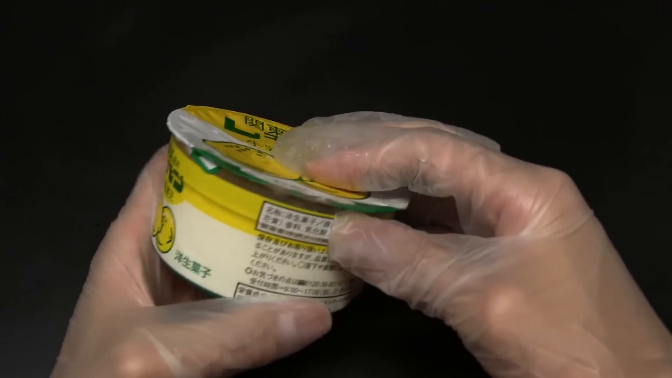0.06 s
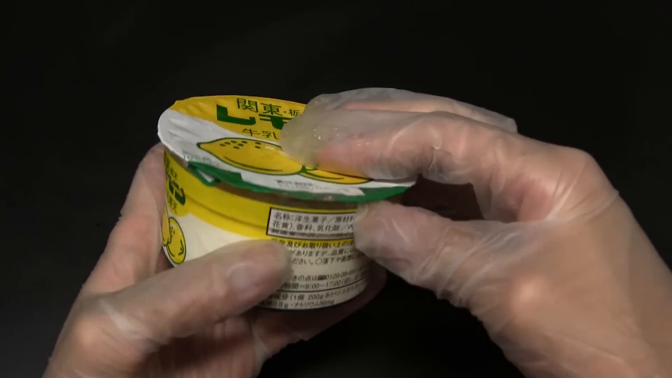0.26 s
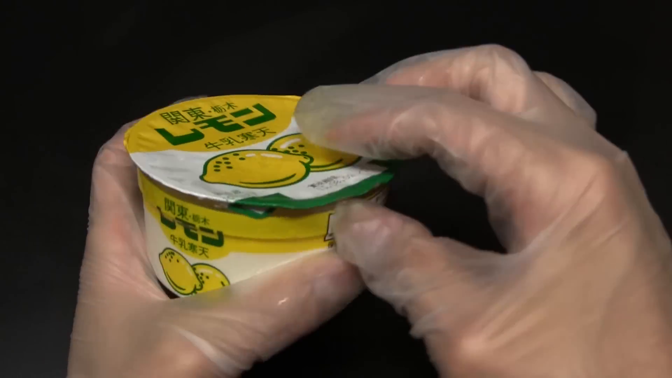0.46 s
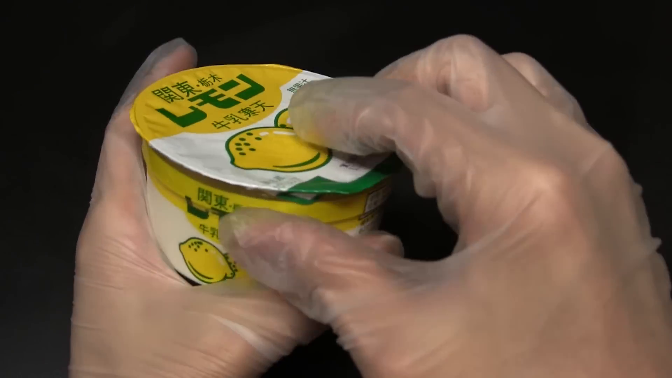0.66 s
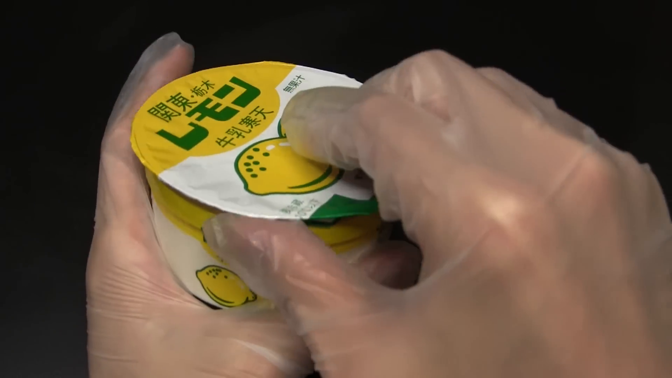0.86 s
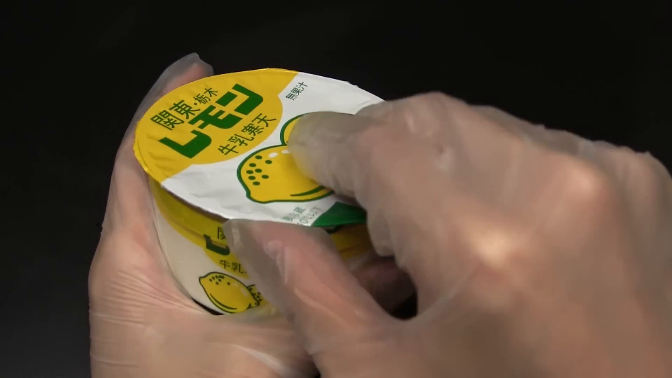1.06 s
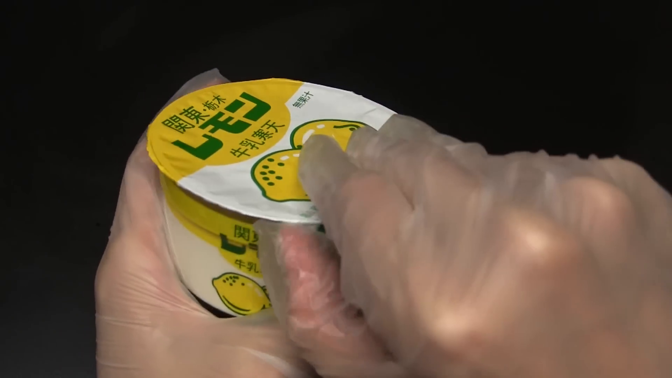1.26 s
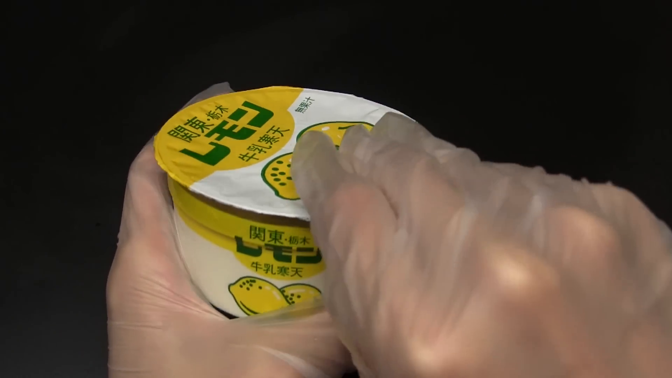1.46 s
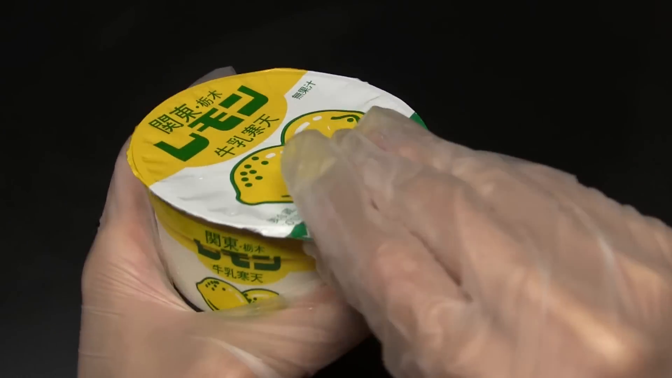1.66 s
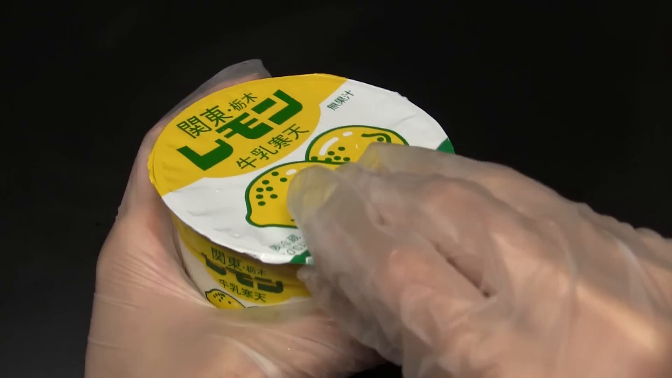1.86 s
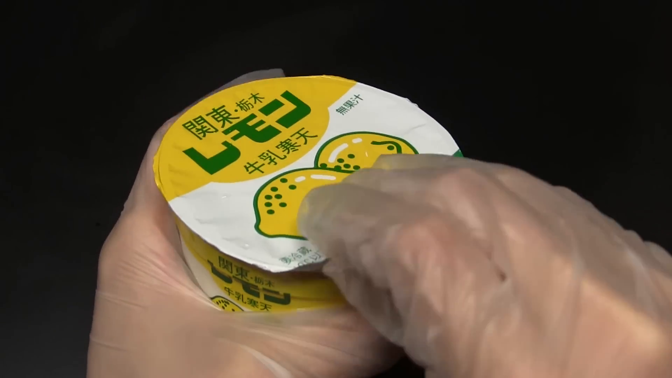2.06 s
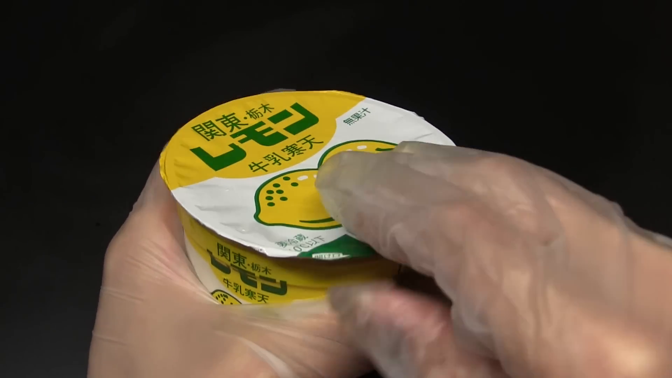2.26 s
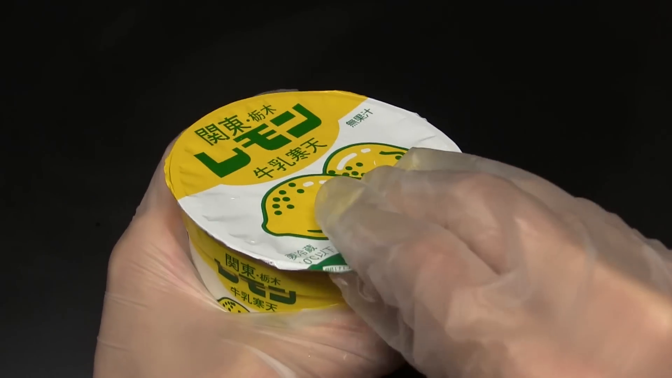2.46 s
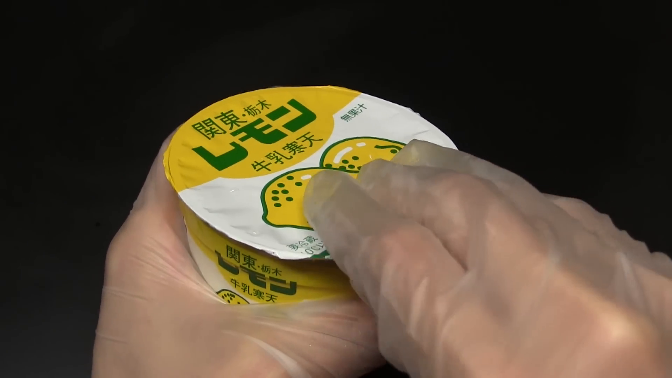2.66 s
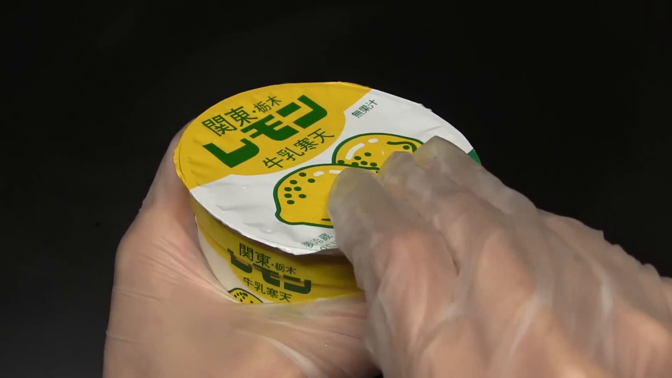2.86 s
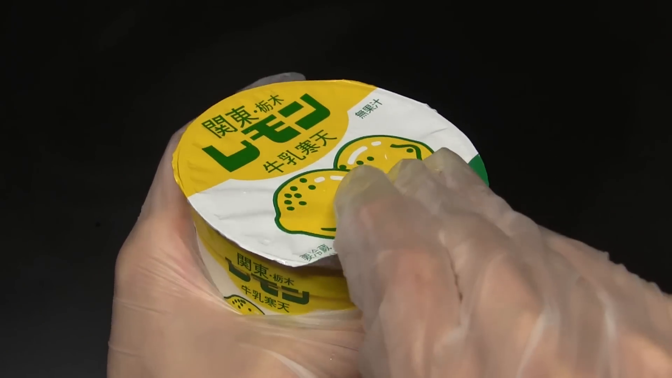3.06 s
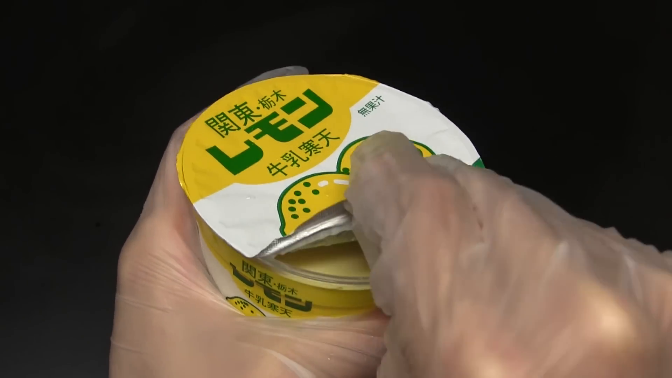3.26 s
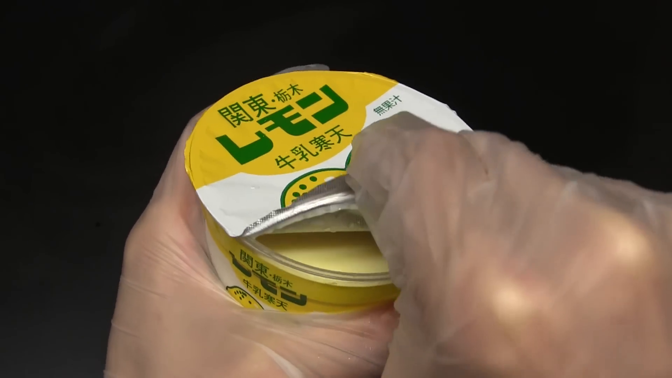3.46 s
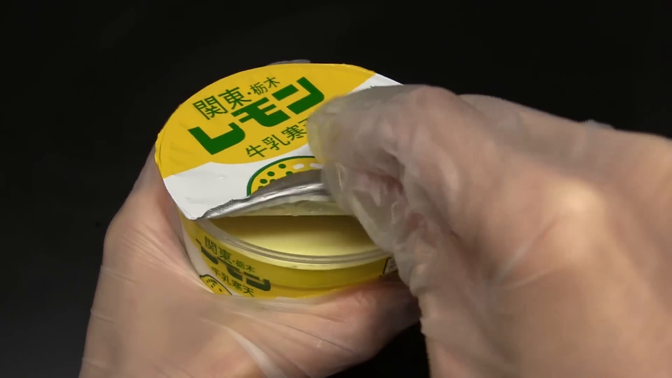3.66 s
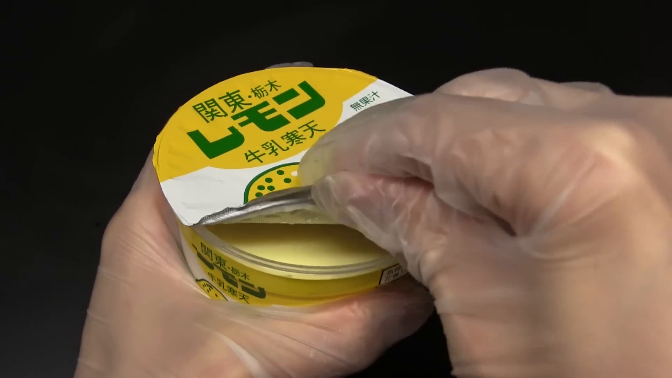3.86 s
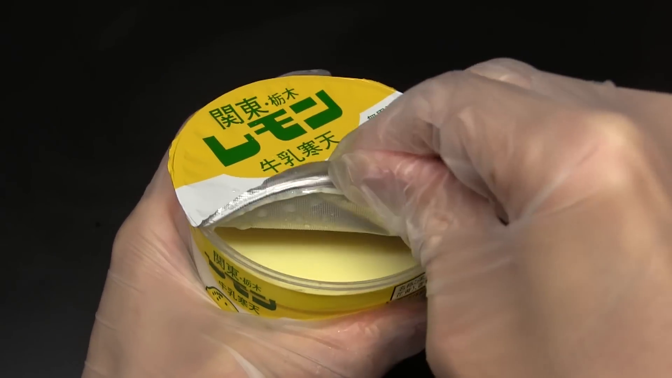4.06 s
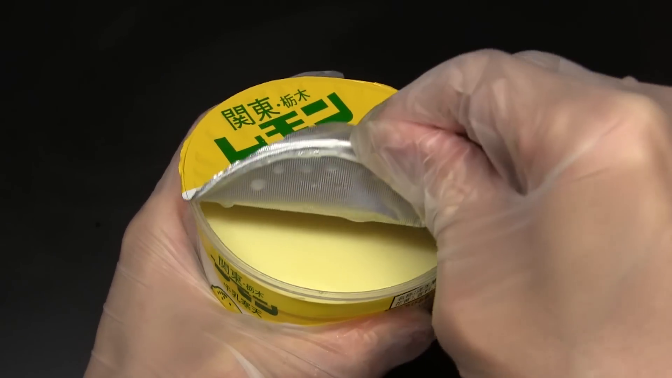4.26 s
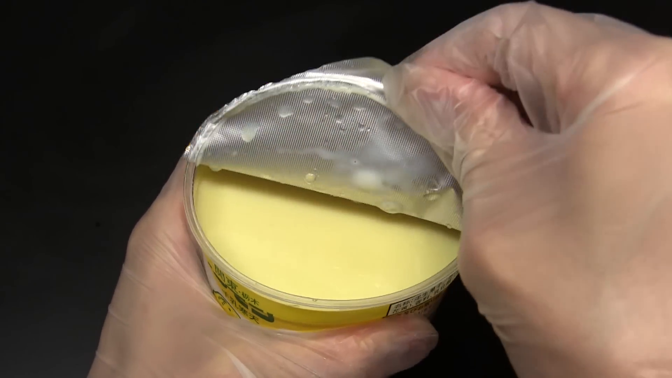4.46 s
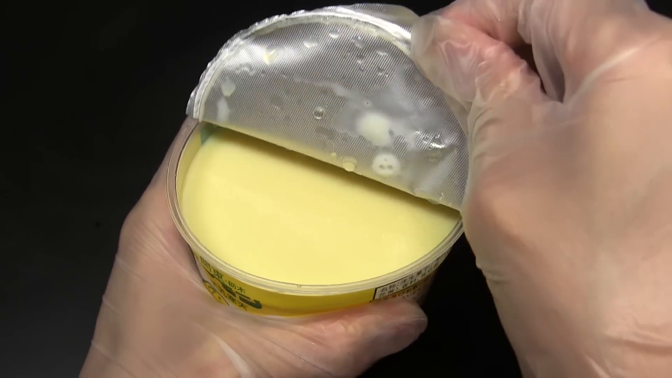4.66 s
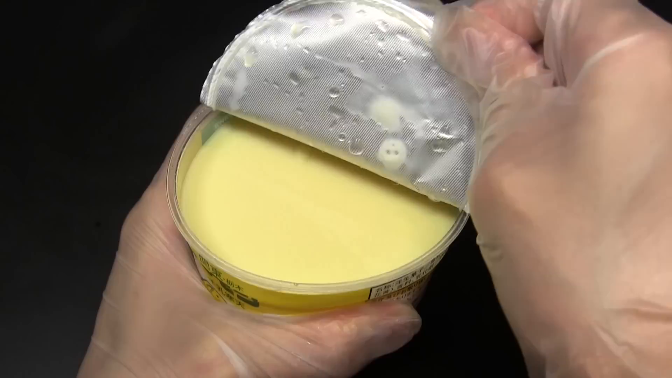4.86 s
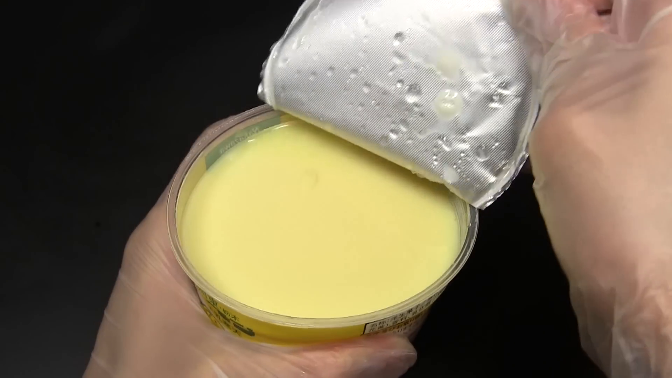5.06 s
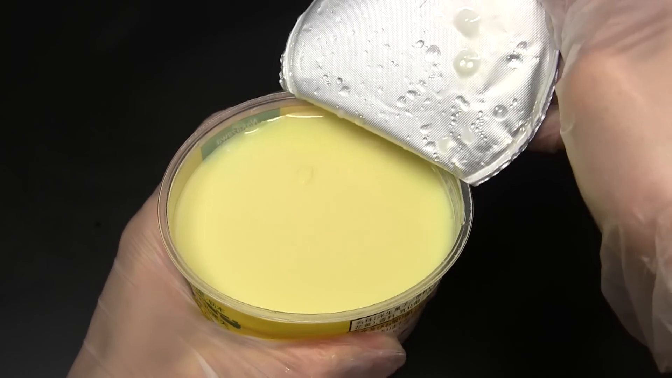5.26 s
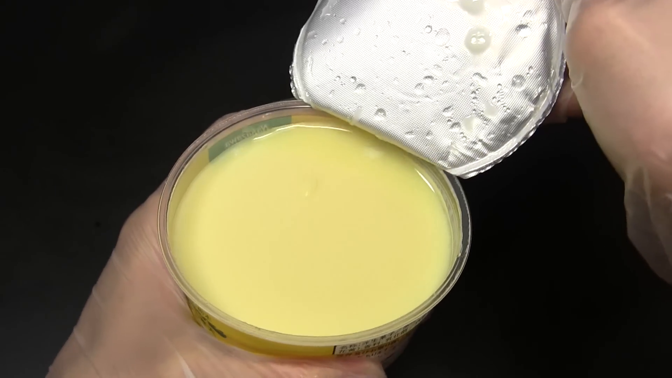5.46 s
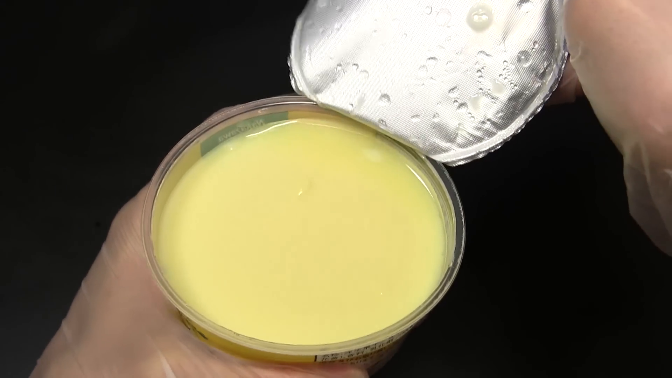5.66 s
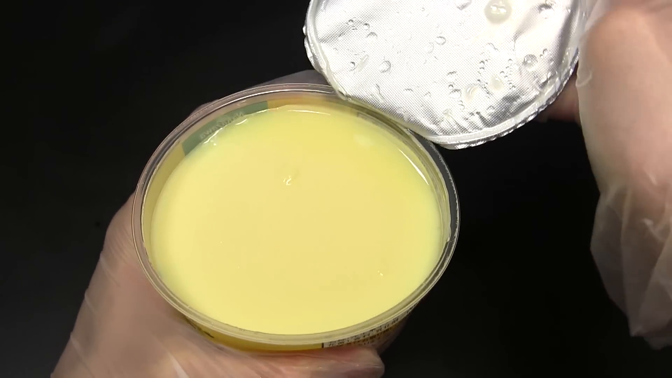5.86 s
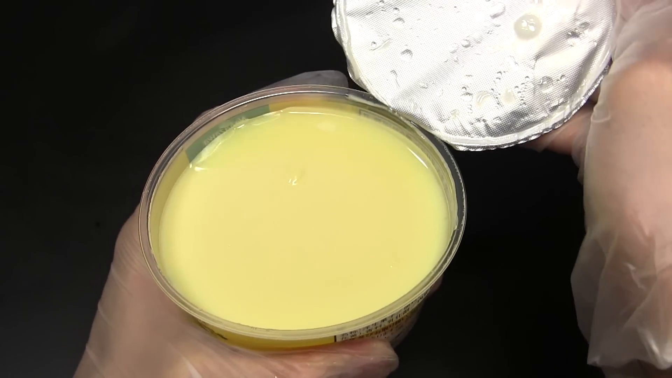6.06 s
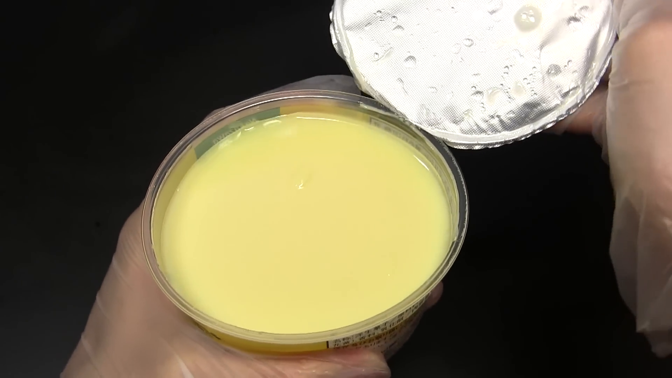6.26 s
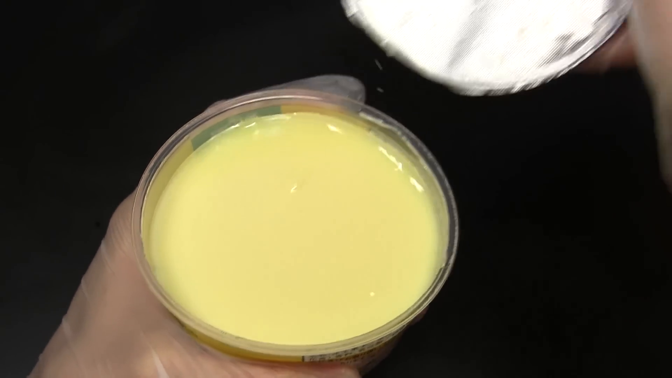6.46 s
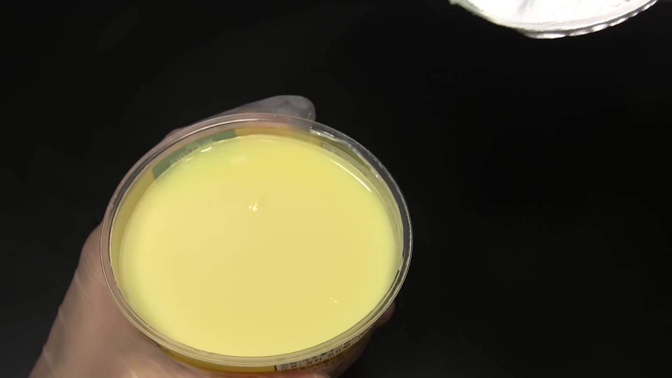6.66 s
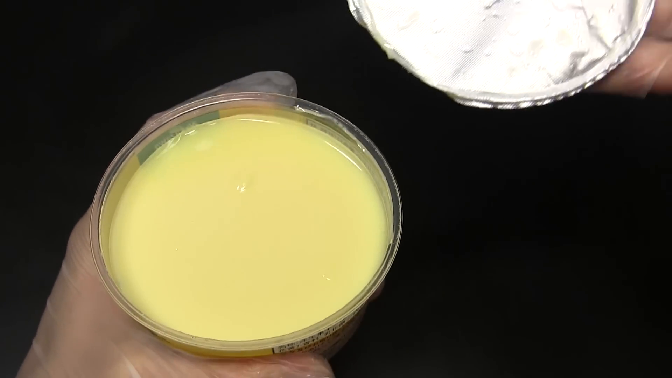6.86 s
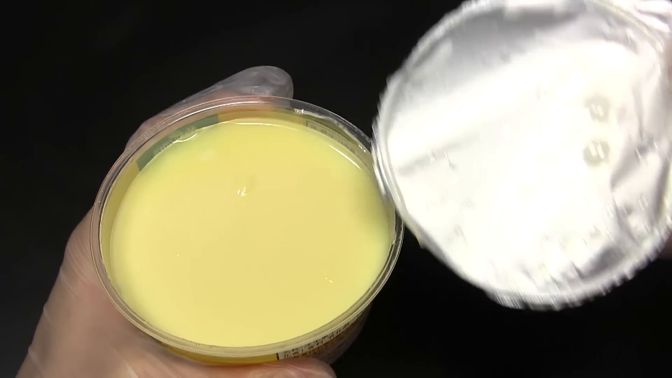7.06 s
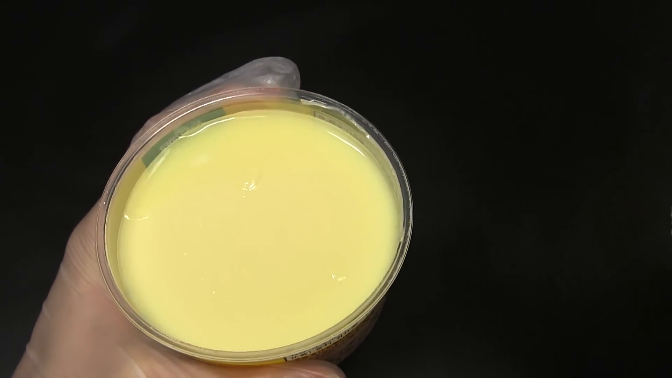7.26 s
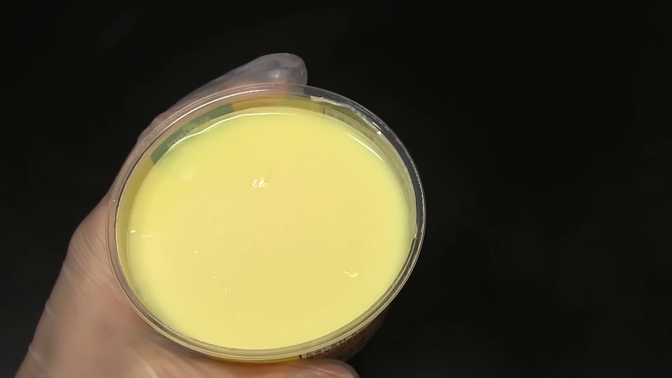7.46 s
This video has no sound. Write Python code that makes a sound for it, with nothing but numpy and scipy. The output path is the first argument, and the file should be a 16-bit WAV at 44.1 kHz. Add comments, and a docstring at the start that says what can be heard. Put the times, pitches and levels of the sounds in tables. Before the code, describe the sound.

Very close in a small dry room, gloved fingers softly rustle and tick against a plastic cup. After about three seconds the glued foil lid breaks loose in a quick crackling rip, followed by hard separate snaps with pauses. The foil then crinkles and flutters with lighter crackles, until a final sharp snap frees it and only quiet hiss remains.

```python
"""Peeling a foil lid

Gloved hands turn a plastic dessert cup close to a microphone, then peel off its foil lid in several pulls.
The seal lets go in separate snaps, each a kick that rings lid and cup; a fast pull crowds them into a rip.
Glue crackle and flexing foil come from random tiny kicks, and the rustle of thin gloves from random slips.
A small dry room adds a faint noise tail, over quiet room tone and hiss."""
import sys
import numpy as np
from scipy import signal
from scipy.fft import rfft, irfft, next_fast_len
from scipy.io import wavfile
from scipy.ndimage import uniform_filter1d, minimum_filter1d

SR = 44100
rng = np.random.default_rng(int(sys.argv[2]) if len(sys.argv) > 2 else 0)


def waveform_to_disk(signal):
    """Save audio, clipped to [-1, 1], as 16-bit WAV at the path in sys.argv[1]."""
    frames = np.transpose(np.atleast_2d(signal))
    scaled = np.clip(frames, -1, 1) * 32767
    samples = np.round(scaled).astype(np.int16)
    wavfile.write(sys.argv[1], SR, samples)


N = 331632
TIME = np.arange(N) / SR
LEFT_RIGHT = np.array([[1], [-1]])  # sign of the sideways sound in each channel

# One spot of the seal lets go or the foil buckles; level_db is that of the middle register:
# start_s, level_db, thud_db (low, relative to level), crack_db (treble, relative to level),
# pitch_hz (note of the freed foil)
SNAPS = [(2.9425, -46, -14.5, 7, 3230), (2.9627, -29, -18.5, 6.5, 3160), (3.0313, -22, -18.5, 2.5, 1550),
         (3.0566, -22, -2, -22.5, 960), (3.0861, -25.5, -3.5, -11, 2060), (3.1023, -21.5, -22, 5, 1480),
         (3.1267, -19.5, 0, -21, 760), (3.1508, -19.5, 1, -6.5, 1020), (3.1855, -23.5, -17, 4, 1930),
         (3.3312, -49.5, 12.5, -20, 950), (3.4722, -21.5, -10.5, 4, 1750), (3.5714, -18, -8.5, 1, 1860),
         (3.6017, -15.5, -10, -2.5, 1870), (3.6789, -32.5, -1, -31, 815), (3.7164, -44, 9, -23, 1080),
         (3.9759, -33.5, 2, -35, 985), (4.0703, -19.5, -12, -8.5, 2780), (4.0783, -32, -10, -4, 2970),
         (4.1018, -16, -18.5, -5, 2050), (4.1703, -12.5, -19.5, -7, 2740), (4.304, -15.5, -14.5, -6, 2060),
         (4.3228, -16.5, -15.5, -8.5, 1570), (4.3437, -18.5, -23, -8.5, 1590),
         (4.434, -32.5, -6, -26, 1490), (4.5487, -19, -9.5, -11.5, 1410), (4.5775, -40, 0, -16, 711),
         (4.6165, -34.5, -11, -20, 1440), (4.652, -40.5, 8.5, -14, 394), (4.6921, -27.5, -21, -9, 2500),
         (4.7041, -24.5, -9.5, -2.5, 1840), (4.7585, -34.5, -9, -7.5, 2680), (4.905, -43.5, -9, -2, 1480),
         (4.9395, -41, -12, -18, 2570), (4.9497, -28, -12, -3, 2620), (4.9565, -28.5, -7, -27, 2470),
         (4.9745, -35, 3, 3, 2090), (4.988, -22, -19, -2.5, 2190), (5.0847, -35.5, -1.5, 16.5, 3800),
         (5.1295, -29.5, -24, 5.5, 3020), (5.1535, -36.5, -4, 0, 744), (5.1773, -31.5, -5, 2.5, 1460),
         (5.1932, -41, -9, 7, 2420), (5.199, -32, -4.5, 1, 1470), (5.215, -49, -4, 4, 2900),
         (5.2264, -32.5, -25, 6, 3770), (5.243, -40.5, -5, 4, 2460), (5.3068, -28.5, -14, -9, 2700),
         (5.3147, -29.5, -6.5, 7, 2630), (5.3412, -42, -8, 10, 1480), (5.4084, -40, 1.5, 6, 1880),
         (5.421, -38, -3, 3, 2570), (5.4291, -29.5, -38, 3.5, 3170), (5.4893, -46, -3, 6, 1480),
         (5.4996, -30, -5, 7, 1390), (5.508, -40, -3, 3, 1480), (5.6469, -24, -18, -2, 2640),
         (5.7372, -40, -11, 2, 2170), (5.7554, -25, -8, -23, 2630), (5.7598, -28.5, -5, 6, 3300),
         (5.902, -47, -14, 2, 1360), (5.934, -28, -20, -5, 2600), (6.0875, -33, -9.5, 5, 1490),
         (6.1684, -25.5, -14, -4, 1480), (6.3814, -43, -8.5, 6.5, 2930), (6.4035, -50, -10, 1, 1440),
         (6.4344, -33, -8, -12, 1600), (6.4481, -35.5, -15, 3.5, 2600), (6.511, -21.5, -10, 0, 2040),
         (6.5166, -31.5, 4, 3, 1440), (6.5246, -17, -8.5, -3, 1480)]
# A stretch of seal unzips in a run of snaps:
# start_s, end_s, snap_count, first_level_db, last_level_db, thud_db and crack_db (relative to level)
RIPS = [(3.1908, 3.2417, 19, -24.5, -23.5, -11.5, 0.5), (3.2545, 3.2648, 3, -21, -21, -15, 2.5),
        (4.1812, 4.1964, 4, -19, -20.5, -19, -4.5), (4.476, 4.4852, 2, -38, -32, 7, -9.5),
        (5.014, 5.037, 4, -31, -34, -2.5, 1.5), (5.3694, 5.38, 3, -48, -39, -9, 5.5),
        (5.4416, 5.473, 4, -44.5, -40.5, 1, 12), (5.5255, 5.5503, 3, -35, -35, -6, -0.5),
        (5.558, 5.593, 5, -41.5, -42, -24, -0.5), (5.6045, 5.6274, 3, -26.5, -27, -12.5, -2.5),
        (5.659, 5.678, 2, -38, -39.5, -19, -2), (5.7714, 5.811, 8, -25.5, -32.5, -15, 0),
        (5.8284, 5.8484, 3, -29, -34.5, -10.5, 0.5), (5.9676, 6.013, 4, -31, -31, -12, -1),
        (6.02, 6.0462, 6, -30, -30, -13.5, 0.5), (6.0566, 6.0647, 2, -40, -42, -25, 10.5),
        (6.123, 6.1509, 4, -38.5, -32.5, -11, 6), (6.4924, 6.503, 3, -36, -27.5, -8, -1)]
# Fingers tap and catch on rim and tab: start_s, level_db, thud_db, crack_db, pitch_hz (as in SNAPS)
FINGER_TAPS = [(0.003, -49, 4, -13, 694), (0.0617, -55.5, -15, 15, 2500), (0.1066, -49, -16, -2, 3000),
               (0.154, -56.5, -8, 12.5, 3030), (0.2453, -51, -21, 1, 2700), (0.3456, -48.5, -10, -17, 2300),
               (1.1555, -30, -28, -42, 2010), (1.3483, -74, -8, 31, 2840), (1.4609, -45.5, -13, 5, 3730),
               (1.9408, -37, -13, -4, 2850), (2.3017, -43.5, -20, -1.5, 2770),
               (2.4508, -59.5, -15, 15.5, 3920), (2.4864, -50.5, -15, 1.5, 3220),
               (6.334, -56, -1, -26, 2020)]
# Ways the lid and cup ring:
# pitch_hz, width_hz (at least a twentieth of the pitch is used), sealed_db, open_db
CUP_MODES = [(388, 230, -4.5, -5.5), (760, 140, -18, -4.5), (986, 237, -3.5, -9), (1480, 79, -1, 1),
             (1850, 560, -2.5, -2.5), (2560, 1000, -4.5, 2), (3305, 87, -16, -9), (3860, 180, -12.5, -6.5),
             (5340, 470, -8.5, -11.5), (5850, 740, -9, 3.5), (6700, 1000, 3, -6), (7890, 340, -5.5, -19.5),
             (8590, 260, -1, -11.5), (12600, 1300, -14, -22)]
# How much of the lid is open: time_s, open_share (0 to 1)
LID_OPENING = [(3.2, 0), (4.3, 0.2), (5.1, 1)]
# The hand tugs at the lid: start_s, end_s, flap_db (flexing), crinkle_db (foil), glue_db (fine crackle)
TUGS = [(3.184, 3.262, -62, -41, -28), (4.345, 4.47, -65, -44.5, -50.5), (4.475, 4.495, -43, -37, -38.5),
        (4.5, 4.64, -48.5, -48, -51), (4.64, 4.712, -46, -40.5, -45), (4.754, 4.768, -52, -48, -52),
        (4.78, 4.92, -75, -62, -57), (4.92, 4.98, -49, -44, -54), (4.98, 5.042, -40, -37, -34.5),
        (5.05, 5.13, -62, -51.5, -44.5), (5.13, 5.225, -47, -51.5, -51), (5.303, 5.32, -47.5, -55, -58),
        (5.33, 5.41, -55, -67, -65.5), (5.41, 5.555, -50.5, -58, -49.5), (5.555, 5.66, -54.5, -62, -68),
        (5.752, 5.775, -42, -40, -44), (5.775, 5.84, -64, -52, -40), (5.85, 6.015, -67, -58.5, -54),
        (6.016, 6.055, -61, -41.5, -45), (6.13, 6.172, -63, -78, -62.5), (6.495, 6.533, -48.5, -59, -36)]
# Lowest note of the loose flap: time_s, pitch_hz
FLAP_NOTE = [(4.5, 188), (4.64, 163), (4.72, 117), (5.0, 183), (5.18, 177), (5.32, 204), (5.6, 190.6),
             (5.8, 180.6), (6.5, 101)]
# Modes of the flap: multiple (of its lowest note), width_hz, level_db (relative)
FLAP_MODES = [(1, 27, 0), (1.55, 60.2, -0.5), (2.3, 55, 0.5), (4.4, 152, 1)]
# A glove slides over cup or lid: start_s, end_s, pressing_db (low), rubbing_db (middle), hiss_db (treble)
STROKES = [(0, 0.028, -61, -60, -54.5), (0.038, 0.466, -73, -64, -60.5), (0.447, 0.57, -80, -64.5, -55),
           (0.04, 0.109, -75, -55.5, -54.5), (0.106, 0.17, -62, -58.5, -53.5), (0.23, 0.254, -71, -62, -51),
           (0.582, 0.604, -87, -63, -45), (0.66, 0.774, -81, -59.5, -65.5),
           (0.826, 0.87, -78, -61.5, -67.5), (0.897, 0.973, -84, -59.5, -57), (1.09, 1.155, -71, -65, -65),
           (1.334, 1.438, -65, -59, -62), (1.444, 1.481, -47.5, -56, -52), (1.56, 1.663, -68, -66, -70),
           (1.652, 1.746, -66, -59, -53.5), (1.8, 1.967, -67.5, -59, -57.5), (1.975, 2.05, -77, -63.5, -62),
           (2.152, 2.19, -61, -62, -47.5), (2.23, 2.357, -69, -65.5, -63), (2.38, 2.45, -67, -62, -56.5),
           (2.56, 2.62, -80, -64.5, -64), (2.689, 2.713, -77, -64.5, -57.5), (2.757, 2.868, -69, -66, -75),
           (3.543, 3.536, -44, -42, -60), (3.761, 3.755, -55, -51, -42.5), (3.79, 3.93, -65, -61.5, -61),
           (3.928, 3.98, -53.5, -62.5, -72), (4.048, 4.05, -50, -54, -52), (6.97, 7.297, -83, -64, -63)]
# Tone colour of the glove film: pitch_hz, level_db (relative)
GLOVE_COLOUR = [(59, -44.5), (100, -13), (492, -18), (1000, -9.5), (1240, -12.5), (1460, 2.5), (1770, 1),
                (3110, 5), (4640, -10), (5960, 0), (12700, -13), (13500, -27), (15000, -78.5)]
# Tone colour of the room's tail: pitch_hz, level_db (relative)
ROOM_COLOUR = [(100, -3.5), (400, 4.5), (1000, 0), (2500, 0), (4500, 2), (7000, -6), (14000, -3.5)]
# Tone colour of room tone and hiss: pitch_hz, level_db (relative)
AIR_COLOUR = [(15, -43.5), (25, -23), (81, -4), (135, -2), (462, -3), (621, 1), (769, -5), (1000, -6),
              (3090, -9), (4150, -12.5), (6540, -13), (10600, -18), (11800, -19), (12800, -53.5),
              (15000, -62.5)]

THUD_HZ, CRACK_HZ = 1100, 4000  # borders between the low, middle and treble registers
BLOW_S = .004  # a blow's level is its rms over this time, before its fade
RING_SIZE = 2048  # samples in one ring
RIP_JITTER = .45  # how far a snap strays, as a share of the gap
RIP_SCATTER_DB = 1.5
RIP_NOTE_HZ, RIP_NOTE_OCTAVES = 1317, 0.9  # lowest note of a freed strip, and the range above it
TUG_ATTACK, TUG_RELEASE_S = .2, 0.0056  # share of the tug spent taking up the slack; time to relax
FLAP_KICKS_PER_S, FLAP_SPREAD_DB = 220, 3
STROKE_ATTACK, STROKE_RELEASE_S = 0.56, .016  # share of the stroke spent speeding up; time to die away
AIR_DB = -64  # level of the part both channels share
TOP_HZ = 14400


def seal():
    """The welded rim tears loose, in single snaps and in runs."""
    return blows(list(SNAPS) + rips(), chatter=1.0, taut_s=0.0027, slack_s=0.0023, buckle_s=0.0013,
                 radiate_hz=595, note_db=2.5, buckle_note_db=1.5, note_width_hz=110, scatter_db=3.5)


def rips():
    """The tear runs along the rim at an uneven, jittered pace, each spot with its own strength and note."""
    rows = []
    for start, end, snaps, first_db, last_db, thud_db, crack_db in RIPS:
        count = max(round(snaps), 2)
        stray, strength, pitch = rng.uniform(-1, 1, (count, 3)).T
        along = np.linspace(0, 1, count)
        along[1:-1] += RIP_JITTER * stray[1:-1] / (count - 1)
        level_db = first_db + along * (last_db - first_db) + RIP_SCATTER_DB * strength
        note_hz = RIP_NOTE_HZ * 2 ** (RIP_NOTE_OCTAVES * (pitch + 1) / 2)
        for place, db, hz in zip(along, level_db, note_hz):
            rows.append((start + place * (end - start), db, thud_db, crack_db, hz))
    return rows


def blows(table, chatter, taut_s, slack_s, buckle_s, radiate_hz, note_db, buckle_note_db, note_width_hz,
          scatter_db):
    """Each release is a sharp kick, then bending waves chatter across the foil and ring the cup.
    Row 0 is the sound sent forwards, row 1 the sound sent sideways."""
    s, level_db, thud_db, crack_db, note_hz = np.transpose(table)[:, :, None]
    t = np.arange(RING_SIZE) / SR
    f = np.fft.rfftfreq(RING_SIZE, 1 / SR)
    opening = np.interp(s, *np.transpose(LID_OPENING))
    # a blow with little treble is the foil popping through
    buckling = np.clip(-(crack_db - 4.0) / 10, 0, 1)
    # chatter time shifts from taut to slack as the lid opens; buckling lengthens it
    chatter_s = taut_s + opening * (slack_s - taut_s) + buckle_s * buckling
    noise = rng.standard_normal((len(s), 2, RING_SIZE)).swapaxes(0, 1)
    waves = unit(noise * np.exp(-t / chatter_s))
    push = chatter * np.sqrt(chatter_s / taut_s / RING_SIZE) * waves
    push[0] += t == 0  # the kick itself goes forwards only
    # every spot on the rim drives the modes differently, and the freed strip adds its own note
    body = cup(f, opening, scatter_db * rng.standard_normal((len(s), len(CUP_MODES))))
    body = body + undb(note_db + buckle_note_db * buckling) * resonance(f, note_hz, note_width_hz)
    # a sealed lid radiates little bass
    bass_edge_hz = radiate_hz * (1 - 0.73 * opening)
    body = body * (1j * f / (1j * f + bass_edge_hz)) ** 2
    parts = zip(registers(irfft(rfft(push) * body)), (thud_db, 0, crack_db))
    rings = sum(unit(part) * undb(level_db + db) for part, db in parts)
    rings = rings * np.sqrt(BLOW_S * SR / RING_SIZE)
    rings = rings * np.clip(2 * (1 - t / t[-1]), 0, 1) ** 2  # each ring fades to silence
    out = np.zeros((2, N + RING_SIZE))
    for start, ring in zip((s[:, 0] * SR).astype(int), rings.swapaxes(0, 1)):
        out[:, start:start + RING_SIZE] += ring
    return out[:, :N]


def cup(f, opening, scatter_db=0):
    """Response of lid and cup; the balance of the modes shifts as the lid comes off."""
    hz, width, sealed_db, open_db = np.transpose(CUP_MODES)
    width = np.maximum(width, hz / 20)  # no mode is narrower than a twentieth of its pitch
    gain = undb(sealed_db + opening * (open_db - sealed_db) + scatter_db)
    return gain @ resonance(f, hz[:, None], width[:, None])


def resonance(f, hz, width_hz):
    """Response of one damped mode, gain 1 at its centre."""
    return 1j * f * width_hz / (hz ** 2 - f ** 2 + 1j * f * width_hz)


def peeling():
    """Glue threads part in dense small grains while the bending foil crinkles and wobbles."""
    flex, crinkle, glue = gestures(TUGS, TUG_ATTACK, TUG_RELEASE_S)
    size = next_fast_len(N)
    body = cup(np.fft.rfftfreq(size, 1 / SR), 0.95)  # a nearly open lid throughout
    kicks = [grains(1300, 5.0), grains(1300, 3.9)]
    threads = irfft(rfft(kicks, size) * body, size)[:, :N]
    creak = unit(band(threads, "band", [600, 3400], order=2)) * crinkle
    crackle = unit(band(threads, "band", [4600, 9500], order=2)) * glue
    return creak + crackle + crinkles(20 * np.log10(crinkle)) + flap() * flex


def crinkles(crinkle_db):
    """The folding foil gives way in many small buckles, each a facet with a note of its own."""
    when, pitch, size, weight = rng.random(size=(240, 4)).T
    first_s, last_s = 4.36, 6.2
    s = first_s + (last_s - first_s) * (np.arange(len(when)) + when) / len(when)
    level_db = np.interp(s, TIME, crinkle_db) - 4.5 + 11 * size
    thud_db, crack_db = -8 + 8 * weight, np.full(len(s), -18)
    note_hz = 700 * 3.8 ** pitch
    table = np.column_stack([s, level_db, thud_db, crack_db, note_hz])
    return blows(table, chatter=3.7, taut_s=0.0062, slack_s=0.0025, buckle_s=0.0051, radiate_hz=350,
                 note_db=0.5, buckle_note_db=8.5, note_width_hz=170, scatter_db=6)


def flap():
    """Small crinkles ring the loose foil, whose modes glide as it bends."""
    note_hz = np.interp(TIME, *np.transpose(FLAP_NOTE))
    phase = 2 * np.pi * np.cumsum(note_hz) / SR
    out = 0
    for multiple, width_hz, db in FLAP_MODES:
        turn = np.exp(1j * multiple * phase)
        # shift the kicks down by the gliding note, smooth them, then shift back up: a moving resonance
        shifted = grains(FLAP_KICKS_PER_S, FLAP_SPREAD_DB) / turn
        mode = (turn * band(shifted, "low", width_hz / 2, order=2)).real
        out = out + undb(db) * unit(mode)
    return unit(out)


def fingers():
    """Light taps kick the cup while it is turned and the tab is sought."""
    return blows(FINGER_TAPS, chatter=1.8, taut_s=0.0041, slack_s=0.0018, buckle_s=0.0004, radiate_hz=110,
                 note_db=2.5, buckle_note_db=6, note_width_hz=650, scatter_db=3.5)


def gloves():
    """Thin plastic film slides in countless small slips."""
    slips = np.array([grains(4000, 2.6), grains(5000, 4.3)])
    slips = band(colour(slips, GLOVE_COLOUR), "high", 110, order=2)
    gains = gestures(STROKES, STROKE_ATTACK, STROKE_RELEASE_S)
    return sum(unit(part) * gain for part, gain in zip(registers(slips), gains))


def gestures(table, attack, release_s):
    """Each hand movement swells, holds and dies away; one gain through time for each level column."""
    power = 0
    for start, end, *levels_db in table:
        rise = np.clip((TIME - start) / max(attack * (end - start), 1 / SR), 0, 1)
        fall = np.exp(-np.clip((TIME - end) / release_s, 0, 20))
        power = power + np.outer(undb(levels_db) ** 2, (rise * fall) ** 2)
    return np.sqrt(power)


def grains(per_s, spread_db):
    """Random tiny slips, most weak and a few strong."""
    happens = rng.random(N) < per_s / SR
    strength_db = spread_db * np.minimum(rng.exponential(size=N), 4)
    return happens * rng.choice([-1, 1], N) * undb(strength_db)


def room(x, wet_db, t60_s, treble_t60_s, build_s):
    """A faint diffuse tail builds up after the direct sound, then dies with its own time in the treble."""
    t = np.arange(SR // 2) / SR
    mid, side = rng.standard_normal((2, 2, 1, len(t)))
    noise = mid + 0.24 * LEFT_RIGHT * side  # forward and sideways sound take different paths
    low = band(noise, "low", 5000) * undb(-60 * t / t60_s)
    high = band(noise, "high", 5400) * undb(-60 * t / treble_t60_s)
    tail = (low + high) * (1 - np.exp(-(t / build_s) ** 2))
    tail = colour(unit(tail) / np.sqrt(2 * len(t)), ROOM_COLOUR)
    return undb(wet_db) * signal.fftconvolve(x[:, None], tail, axes=2).sum(axis=0)[:, :N]


def air():
    """Quiet room tone and microphone hiss, made of coloured noise."""
    mid, side = unit(colour(rng.standard_normal((2, N)), AIR_COLOUR))
    return undb(AIR_DB) * (mid + 0.68 * LEFT_RIGHT * side)


def undb(db):
    """Decibels to gain."""
    return 10 ** (np.asarray(db) / 20)


def unit(x):
    """Scale to rms 1."""
    return x / np.sqrt(np.mean(x ** 2, axis=-1, keepdims=True) + 1e-20)


def colour(x, points):
    """Shape a sound's spectrum with a gain curve through (pitch_hz, level_db) points."""
    hz, db = np.transpose(points)
    size = next_fast_len(x.shape[-1])
    f = np.fft.rfftfreq(size, 1 / SR)
    gain = undb(np.interp(np.log(f + 1), np.log(hz), db))
    return irfft(rfft(x, size) * gain, size)[..., :x.shape[-1]]


def band(x, kind, hz, order=3):
    """Keep part of the spectrum with a smooth (Butterworth) filter."""
    return signal.sosfilt(signal.butter(order, hz, kind, fs=SR, output="sos"), x)


def registers(x):
    """Low, middle and treble parts of a sound."""
    low = band(x, "low", THUD_HZ, order=5)
    middle = band(x, "band", [THUD_HZ, CRACK_HZ])
    treble = band(x, "high", CRACK_HZ, order=5)
    return low, middle, treble


def scene():
    """Hands, lid and room together; the two capsules agree in the bass and differ more in the treble."""
    near = seal() + fingers() + peeling() + gloves()
    forward, sideways = near
    side = undb(-12) * band(sideways, "high", 4900, order=1) + undb(-28.5) * sideways
    direct = forward + LEFT_RIGHT * side
    return direct + room(near, wet_db=-13.5, t60_s=0.29, treble_t60_s=0.31, build_s=0.013) + air()


def record(dry):
    """The left capsule has a little more bass; a fast limiter holds the sharpest snaps; the top is cut."""
    tilted = dry + .12 * LEFT_RIGHT * band(dry, "low", 1000, order=1)
    ceiling = .76  # full scale is 1
    gain = ceiling / np.maximum(np.abs(tilted).max(axis=0), ceiling)
    limited = tilted * uniform_filter1d(minimum_filter1d(gain, size=41), size=41)
    return signal.sosfilt(signal.ellip(8, .2, 70, TOP_HZ, fs=SR, output="sos"), limited)


dry = scene()
out = record(dry)
waveform_to_disk(out)
```